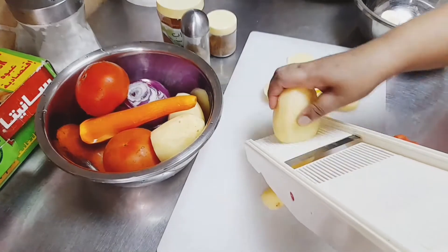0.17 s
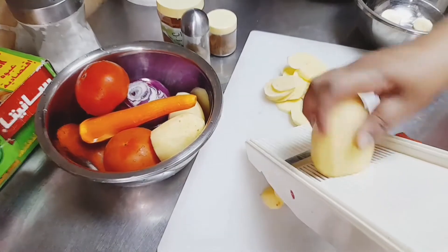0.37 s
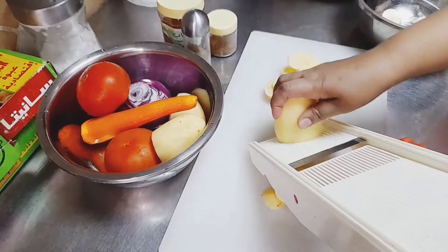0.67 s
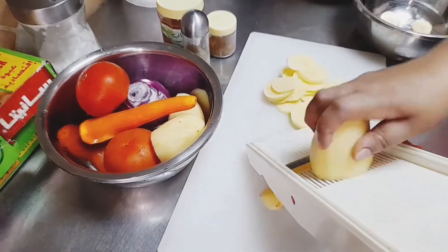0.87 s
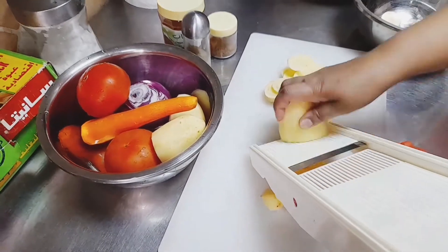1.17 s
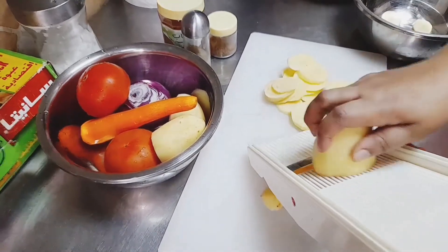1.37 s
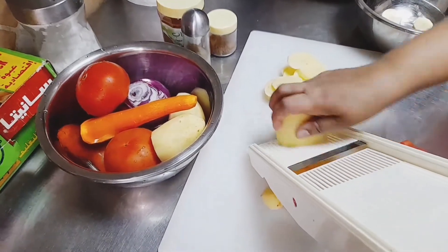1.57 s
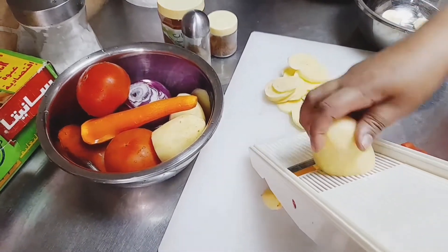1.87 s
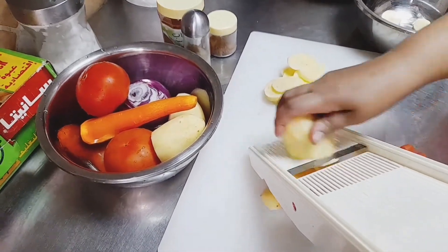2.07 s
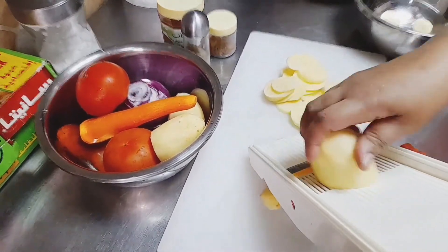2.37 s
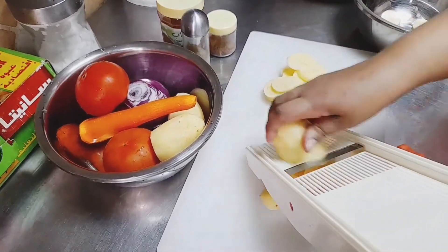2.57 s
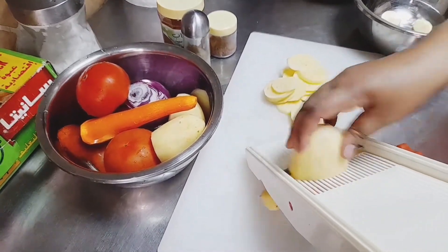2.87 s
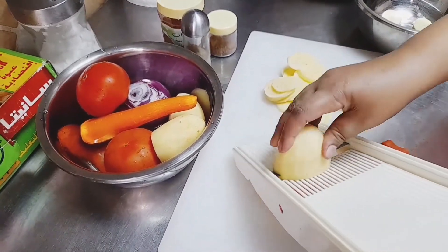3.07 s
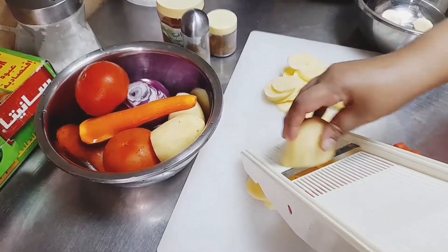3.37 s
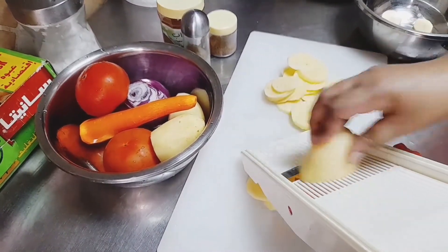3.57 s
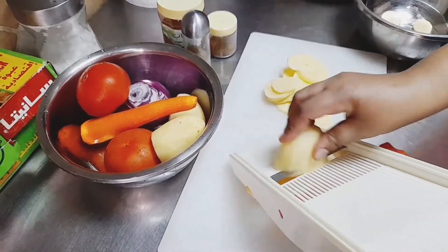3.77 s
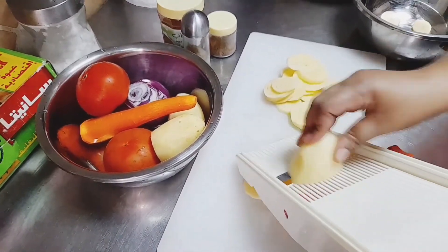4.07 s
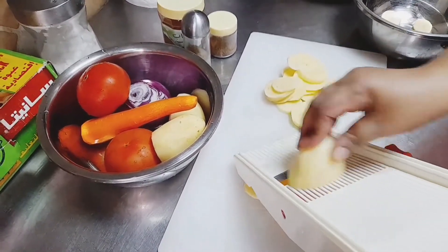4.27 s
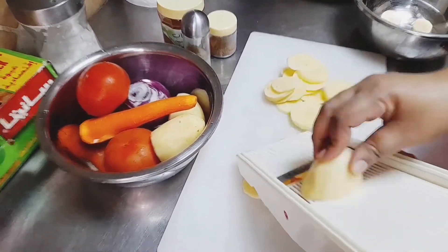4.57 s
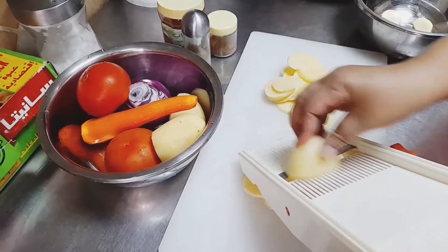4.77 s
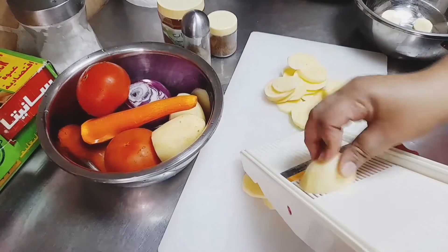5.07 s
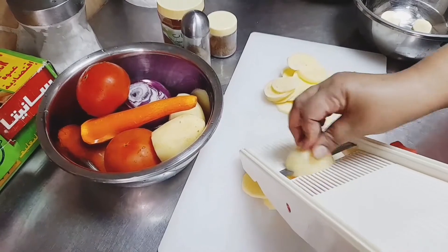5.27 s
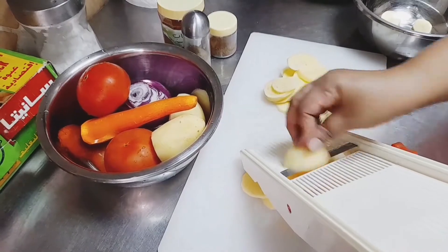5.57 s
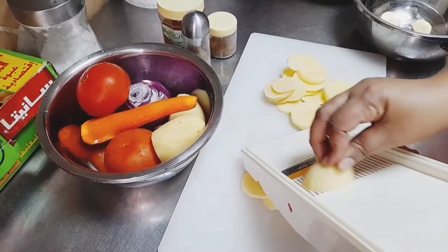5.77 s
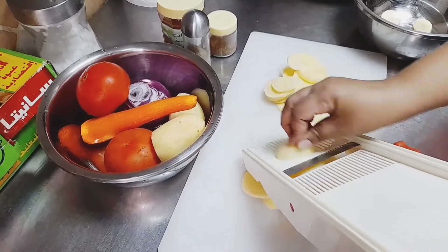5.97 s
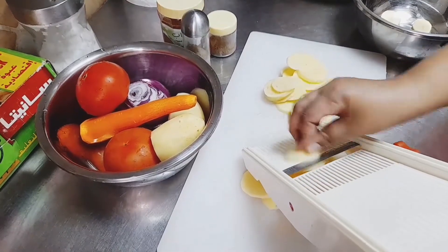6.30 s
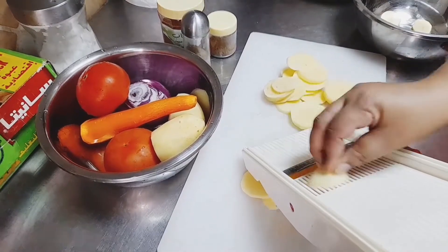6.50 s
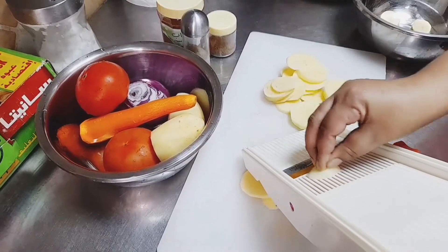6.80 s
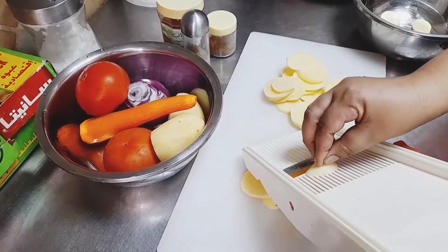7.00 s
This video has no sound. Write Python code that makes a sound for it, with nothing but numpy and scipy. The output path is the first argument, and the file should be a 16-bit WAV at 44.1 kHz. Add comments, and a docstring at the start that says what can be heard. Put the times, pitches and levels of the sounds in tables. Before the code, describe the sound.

A raw potato is sliced on a plastic slicer, heard close and slightly to the right in a small, hard kitchen. From the start, the blade makes short, fine, wet rasps about every half second, and a jostled metal utensil clinks at 0.2 seconds. Between cuts the plastic frame gives sharp, briefly ringing clacks, louder than the rasps, roughly twice a second. Dull thuds of potato on the frame cluster in the first second. From about 2.8 seconds the cuts become shorter and quicker, around three a second, with light ticks and very faint wet glides between them. Clacks and thuds are strong from 4.5 to 5.1 seconds, and return at about 5.6, 6.2 and 6.5. A last small cut and a softer clink come near 6.8 seconds. A low worktop rumble and faint room tone lie underneath, and the walls add a short tail.

```python
"""A small, hard kitchen: a raw potato is pushed again and again over a plastic slicer on a cutting board.
The blade tears through wet cells with a short, fine rasp, and the worktop rumbles under the pushing hand.
Flesh thuds on the frame, the plastic clacks, rings and ticks, and a jostled utensil clinks twice.
Between cuts the potato glides faintly over the wet ramp. The close walls add a short tail."""
import sys
import numpy as np
from scipy import signal
from scipy.fft import rfft, irfft, next_fast_len
from scipy.io import wavfile
from scipy.ndimage import uniform_filter1d

SR = 44100
rng = np.random.default_rng(int(sys.argv[2]) if len(sys.argv) > 2 else 0)


def unload_wav(signal):
    """Save mono or channel-first audio to the path in sys.argv[1] as 16-bit WAV at rate SR, clipped to [-1, 1]."""
    wavfile.write(
        sys.argv[1],
        SR,
        np.round(np.clip(np.atleast_2d(signal).T, -1, 1) * 32767).astype(np.int16),
    )


N = 314765
T = np.arange(SR // 2) / SR  # time within one hit


def amp(db):
    """Decibels to gain."""
    return 10 ** (np.asarray(db) / 20)

def unit(x):
    """Scale to rms 1."""
    return x / np.sqrt(np.mean(x ** 2) + 1e-20)

def along(points, hz):
    """Read (frequency, value) points on a log axis."""
    f, v = np.transpose(points)
    return np.interp(np.log(hz + 1), np.log(f + 1), v)

def add(track, s, sound):
    """Mix a sound into the track from time s on."""
    part = track[:, max(0, round(s * SR)):][:, :sound.shape[-1]]
    part += sound[..., :part.shape[1]]

def filtered(x, response):
    """EQ x with a gain given as a function of frequency."""
    size = next_fast_len(x.shape[-1] + 8192)
    return irfft(rfft(x, size) * response(np.fft.rfftfreq(size, 1 / SR)), size)[..., :x.shape[-1]]

# Stereo width: f/Hz, side minus mid/dB
WIDTH = [(60, -12), (250, -10), (700, -6), (1200, 0), (2200, -2), (5500, 1), (8000, -4), (14000, -4)]
def spread(pair):
    """Two unrelated signals become left and right, near mono in the bass."""
    side = filtered(pair[1], lambda hz: amp(along(WIDTH, hz)))
    return unit(np.array([pair[0] + side, pair[0] - side]))

def noise(spectrum, size=len(T)):
    """Coloured stereo noise of rms 1."""
    return spread(filtered(rng.standard_normal((2, size)), lambda hz: amp(along(spectrum, hz))))

def contact(hz):
    """Noise of a brief touch: a broad hump around its centre."""
    return noise([(hz / 8, -18), (hz / 2.5, -3), (hz * 1.2, 0), (hz * 2.2, -12), (hz * 6, -22)])

def attack(rise):
    """Onset of a hit, with a time constant in seconds."""
    return 1 - np.exp(-T / rise)

def fade(rise, t60):
    """Envelope of a hit: quick attack, exponential decay."""
    return attack(rise) * amp(-60 * T / t60)

def radiation(phase, pan_db):
    """Each mode radiates its own way: its complex gain to left and right."""
    side = np.array([[.5], [-.5]])
    return unit(amp(side * pan_db)) * np.exp(1j * side * phase)

def ring(modes, scatter_db, damping=0):
    """Modes struck at fresh strengths and slightly detuned; a gripping hand adds damping in dB/s."""
    out = np.zeros((2, len(T)))
    for hz, db, t60, phase, pan_db in modes:
        pitch = hz * (1 + rng.normal(0, .005))
        wave = np.exp(1j * (2 * np.pi * pitch * T + rng.uniform(0, 2 * np.pi)))
        level = db + rng.normal(0, scatter_db) - (60 / t60 + damping) * T
        out += amp(level) * np.real(radiation(phase, pan_db) * wave)
    return out / np.sqrt(sum(amp(mode[1]) ** 2 for mode in modes))

def resonate(force, modes):
    """Modes of alternating polarity, driven by a continuous force."""
    def response(f):
        total = 0
        for k, (hz, db, t60, phase, pan_db) in enumerate(modes):
            peak = 1 / (1 + 2j * np.pi * (f - hz) * t60 / np.log(1000))
            total += (-1) ** k * amp(db) * radiation(phase, pan_db) * peak
        return total
    return unit(filtered(force, response))

# Reverb time of the kitchen: f/Hz, t60/s
KITCHEN_DECAY = [(100, 0.17), (500, 0.44), (1400, 0.28), (4000, 0.29), (9000, 0.28), (16000, 0.23)]
def kitchen(x, wet_db):
    """The sound with a fresh diffuse tail from the close walls."""
    hz, t, bands = signal.stft(noise([(20, 0.02), (20000, 0)]), SR, nperseg=256)
    decay = amp(-60 * t / along(KITCHEN_DECAY, hz)[:, None])
    tail = signal.istft(bands * decay, SR, nperseg=256)[1][:, :len(T)]
    bloom = 1 - np.exp(-(T / 0.0078) ** 2)
    tail = unit(tail * bloom) / np.sqrt(len(T))
    return x + amp(wet_db) * signal.fftconvolve(x, tail, axes=1)[:, :x.shape[1]]

def reflections(x, db, count=8):
    """Bowls and jars throw the treble back within a few milliseconds and comb it."""
    out = x.copy()
    treble = filtered(x, lambda hz: np.clip(hz / 1500 - 1, 0, 1))
    for delay in rng.uniform(.0008, .009, count):
        add(out, delay, amp(db) * rng.standard_normal((2, 1)) * treble)
    return out

def stroke(start, length, db, change_db, rise, release):
    """Strength of one rub: it sets in, ramps by change_db and stops as the potato runs off."""
    t = np.arange(N) / SR - start
    from_middle = np.clip(t / length, 0, 1) - .5
    gate = np.clip(t / rise + .5, 0, 1) * np.clip((length - t) / release + .5, 0, 1)
    return gate * amp(db + change_db * from_middle)

# Passes of the blade through the potato: t/s, length/s, level/dB, change from bite to exit/dB
CUTS = [(0.0, 0.13, -39, -9.5), (0.472, 0.12, -38.5, 0), (0.93, 0.13, -39, -0.5), (1.419, 0.1, -38, -4),
        (1.962, 0.109, -38.5, 2.5), (2.405, 0.18, -39.5, -5.5), (2.847, 0.067, -37.5, -5.5),
        (3.115, 0.049, -39, 2), (3.564, 0.06, -35.5, -1.5), (3.749, 0.05, -40.5, 10),
        (4.039, 0.085, -37.5, -4), (4.372, 0.023, -38, 1), (4.604, 0.062, -35.5, -4.5),
        (4.866, 0.059, -37.5, 1), (5.104, 0.068, -38.5, 0.5), (5.42, 0.025, -38.5, 3),
        (5.803, 0.025, -41.5, 6.5), (5.863, 0.073, -39, 0.5), (6.235, 0.062, -37.5, -1.5),
        (6.525, 0.055, -40, -3), (6.706, 0.034, -49, 20)]
def cutting():
    """Force on the blade as it bites and lets go, cut after cut."""
    return sum(stroke(*row, rise=0.013, release=0.013) for row in CUTS)

def cell_bursts():
    """Thousands of cells burst each second, so closely that they merge into a fizz."""
    strength = amp(2 * rng.standard_normal(N)) * (rng.random(N) < .7)
    return strength * rng.standard_normal((2, N))

# Colour of the wet rasp: f/Hz, level/dB
RASP_EQ = [(600, -11), (950, -9), (1500, -3), (2050, -5), (2400, -3), (2950, -7), (3310, -1), (3730, -6.5),
           (4240, -3), (5070, -7.5), (6500, -3.5), (7400, -1), (8700, -10), (11800, -1), (15600, -5.5)]
# Low and high modes of the plastic frame: f/Hz, level/dB, t60/s, left lead/rad, left minus right/dB
FRAME_LOW = [(312.4, -3, 0.11, 0.7, -9), (393, -12, 0.016, -0.1, -10), (404, -3.5, 0.099, 0.4, -5.5),
             (474.7, 3.5, 0.091, 0.52, 1.5), (594.7, -1, 0.076, 0.7, -13), (651.5, 0.5, 0.07, 0, 12),
             (737.3, -1.5, 0.072, -0.2, 0), (817.5, -3, 0.1, -0.2, 4)]
FRAME_HIGH = [(1113, -2.5, 0.095, -1.3, 0.5), (1190, -0.5, 0.11, -3, 2), (1259.7, 5, 0.067, 1.02, -2.5),
              (1397, 1, 0.072, -2.5, 2), (1456, 1.5, 0.076, -2.3, -0.5), (1557, -6.5, 0.045, 0, -3),
              (1733, -3.5, 0.052, 0.5, 13), (1866, -5, 0.065, -2.5, 8), (2025, -2, 0.066, -2, -1),
              (2400, -10, 0.13, -5.5, -2.5)]
def slicing(force):
    """Dense cell bursts hiss at the blade and shake the modes of the frame."""
    grain = amp(1.2 * unit(uniform_filter1d(rng.standard_normal(N), 180)))  # the flesh is uneven
    hiss = spread(filtered(cell_bursts(), lambda hz: amp(along(RASP_EQ, hz))))
    drag = cell_bursts()[0]
    body = amp(-10) * resonate(drag, FRAME_LOW) + amp(-7) * resonate(drag, FRAME_HIGH)
    return kitchen(force * grain * (amp(4.5) * hiss + body), wet_db=-6.5)

# Swells as the hand shifts its weight, and the fader curve of its steady tremor: t/s, level/dB
LEANS = [(0.2, -45), (0.42, -42.5), (0.63, -35.5), (1.14, -48), (2.09, -50), (2.46, -44), (2.62, -49),
         (2.86, -36), (3.25, -39), (3.82, -42.5), (3.92, -46), (4.06, -38.5), (4.47, -43), (4.99, -44),
         (5.5, -53), (5.7, -42), (6.76, -59)]
TREMOR = [(0, -42.5), (1.0, -47), (1.85, -51.5), (2.25, -54), (2.7, -46), (3.4, -51), (6.0, -49.5),
          (6.8, -53.5), (7.14, -62)]
# Colour of the worktop's rumble: f/Hz, level/dB
RUMBLE_EQ = [(20, -57), (30, -38), (40, -20), (48, -13), (62, -5.5), (71, 4.5), (84, -6.5), (98, -6),
             (119, -2.5), (140, -20), (161, -6.5), (195, -20), (310, -12), (500, -34), (900, -44)]
def worktop(cut):
    """Cuts, knocks and the leaning hand feed the low modes of the steel top."""
    t = np.arange(N) / SR
    decay = fade(rise=.008, t60=0.49) ** 2
    power = np.abs(signal.fftconvolve((amp(-6.5) * cut) ** 2, decay / decay.sum()))[None, :N]
    for s, _, _, knock_db, _ in CLACKS:
        add(power, s, amp(knock_db - 14) ** 2 * decay)
    for s, db in LEANS:
        power += amp(db) ** 2 * np.exp(-((t - s) / 0.029) ** 2)  # a push of about 60 ms
    tremor = amp(np.interp(t, *np.transpose(TREMOR)))
    return np.sqrt(power + tremor ** 2) * noise(RUMBLE_EQ, N)

# Colour of the still kitchen: f/Hz, level/dB
ROOM_EQ = [(20, -25.5), (30, -8), (42, 18), (70, 20), (150, 31), (300, 24.5), (600, 17.5), (900, 8.5),
           (1500, 4.5), (3000, -4), (7000, -10), (12000, 1), (15500, -6.5), (16500, -27)]
def room_tone():
    """The steady air of the room, a faint dark bed."""
    return amp(-55) * noise(ROOM_EQ, N)

# Dull bumps of potato and hand on the frame: t/s, level/dB
BUMPS = [(0.189, -30.5), (0.245, -39.5), (0.319, -31.5), (0.491, -31.5), (0.637, -26.5), (0.815, -31.5),
         (0.88, -25.5), (0.932, -29.5), (1.047, -25), (1.302, -37), (2.859, -28.5), (3.154, -28.5),
         (3.558, -32), (3.584, -39), (3.793, -35), (4.038, -27.5), (4.274, -39), (4.565, -21),
         (4.824, -24.5), (5.069, -21.5), (5.323, -37), (5.409, -29), (5.835, -34), (5.89, -30.5),
         (5.929, -28), (6.17, -22), (6.294, -32), (6.463, -21), (6.568, -32.5)]
# Colour of the thud: f/Hz, level/dB
THUD_EQ = [(100, -22.5), (220, -9.5), (320, 2), (480, -3), (650, -9), (900, -23), (2000, -20.5),
           (6000, -47)]
def bumps():
    """Soft flesh gives only a low thud."""
    out = np.zeros((2, N))
    for s, db in BUMPS:
        add(out, s, amp(db) * noise(THUD_EQ) * fade(rise=0.0016, t60=0.083))
    return out

# Jostled utensils: t/s, contact level/dB, ring level/dB, contact centre f/Hz
CLINKS = [(0.2, -12, -23.5, 2450), (6.824, -26.5, -27.5, 1300)]
# Metal modes, one set per clink: f/Hz, level/dB, t60/s
UTENSIL_MODES = [
    [(758, 5, 0.05), (2024, 10.5, 0.065), (2840, 6, 0.079), (3260, 8.5, 0.15), (3360, -13.5, 0.17),
     (3300, -12, 0.27), (4160, -9, .08)],
    [(650, 13, 0.035), (955, 4.5, 0.097), (1520, -7, .12), (1680, -2, 0.089), (1860, -3, 0.12),
     (2790, -6, 0.09)],
]
def clinks():
    """A brief rattle of contact, then the metal rings on."""
    out = np.zeros((2, N))
    for (s, contact_db, ring_db, hz), modes in zip(CLINKS, UTENSIL_MODES):
        centred = [(*mode, 0, 0) for mode in modes]
        metal = amp(ring_db + 1.5) * ring(centred, scatter_db=0.5) * attack(0.0022)
        rattle = amp(contact_db) * contact(hz) * fade(rise=0.0053, t60=0.049)
        add(out, s, metal + rattle)
    return kitchen(out, wet_db=-8)

# The potato lands or leaves: t/s, crack level/dB, ring level/dB, knock level/dB, hand damping/(dB/s)
CLACKS = [(0.3626, -13.5, -21.5, -22.5, 0), (0.574, -21.5, -22, -23, 400), (0.860, -13.5, -20.5, -18.5, 50),
          (1.054, -18, -19.5, -21, 350), (1.3652, -13.5, -17.5, -17, 50), (1.8644, -18, -25, -24, 0),
          (2.329, -16.5, -23, -20, 100), (2.784, -16, -19, -18.5, 252), (3.162, -25, -24, -24.5, 300),
          (3.466, -26, -28, -26, 103), (3.477, -21.5, -39, -25, 100), (3.9889, -14, -19.5, -17.5, 100),
          (4.352, -36, -37.5, -29.5, 50), (4.544, -15, -19, -17, 50), (4.799, -13.5, -26, -19, 46),
          (4.808, -15, -22.5, -20.5, 50), (5.052, -18, -21, -20, 48), (5.384, -31, -39, -40, 50),
          (5.6075, -14, -20, -19, 50), (6.144, -17.5, -22.5, -27, 100), (6.168, -24, -25.5, -24, 100),
          (6.439, -23, -28, -30, 103.5), (6.453, -19, -22, -25.5, 100), (6.736, -34.5, -35.5, -29.5, 99)]
# Colours of the first hard snap, the chattering crack and the frame's heave: f/Hz, level/dB
SNAP_EQ = [(1000, -26), (5000, -7), (8700, -11), (12000, -1.5), (15500, -6)]
CRACK_EQ = [(600, -12.5), (1200, 0.5), (2000, 3), (2800, -2.5), (4000, -0.5), (5500, -2), (7400, 0.5),
            (8700, -8), (10000, -5.5), (12000, -0.5), (15500, -7.5), (17000, -12)]
HEAVE_EQ = [(150, -20), (350, -15.5), (780, 6.5), (960, -11.5), (1300, -5), (2100, -14.5), (4000, -31)]
def clacks():
    """Plastic snaps down and chatters for a few milliseconds; the frame's low modes follow its high ones."""
    out = np.zeros((2, N))
    knots = T[::40]  # the chatter takes a new level about every millisecond
    for s, crack_db, ring_db, knock_db, damping in CLACKS:
        chatter = amp(1.45 * np.interp(T, knots, rng.standard_normal(len(knots))))
        snap = amp(crack_db - 2) * noise(SNAP_EQ) * fade(rise=0.00015, t60=0.023)
        crack = amp(crack_db + 0.5) * noise(CRACK_EQ) * chatter * fade(rise=0.0018, t60=0.045)
        plate = amp(ring_db + 5.5) * ring(FRAME_HIGH, scatter_db=2.5, damping=damping) * attack(0.001)
        knock = amp(knock_db + 2) * ring(FRAME_LOW, scatter_db=1.5, damping=damping / 2) * attack(0.0023)
        heave = amp((ring_db + knock_db) / 2 + 3) * noise(HEAVE_EQ) * fade(rise=0.0051, t60=0.048)
        touch = amp(crack_db - 26) * noise(CRACK_EQ) * fade(rise=.004, t60=.1)
        add(out, s - .008, touch)  # wet flesh lands first
        add(out, s, kitchen(snap + crack, wet_db=-6) + kitchen(plate + knock, wet_db=-6.5))
        add(out, s + 0.001965, heave)  # the feet press into the board
    return out

# Light ticks of the plastic: t/s, level/dB, centre f/Hz
TICKS = [(0.636, -34, 794), (0.821, -59, 1490), (0.85, -29.5, 6000), (1.3, -52.5, 2500),
         (2.616, -43.5, 1040), (2.714, -45.5, 2060), (2.778, -36, 1830), (4.718, -38, 1040),
         (6.031, -34.5, 2090)]
def ticks():
    """A light touch on plastic is all edge and no ring."""
    out = np.zeros((2, N))
    for s, db, hz in TICKS:
        add(out, s, amp(db + 4) * contact(hz) * fade(rise=0.00023, t60=0.027))
    return out

# Glides of the potato over the wet ramp: t/s, length/s, level/dB
GLIDES = [(2.287, 0.056, -53.5), (3.008, 0.1, -53.5), (3.42, 0.049, -60), (3.932, 0.048, -62),
          (4.22, 0.098, -56), (4.508, 0.05, -51.5), (4.76, 0.04, -55.5), (5.014, 0.075, -54),
          (5.265, 0.082, -59.5), (5.5, 0.05, -64), (6.403, 0.067, -54), (6.772, 0.055, -61)]
def gliding():
    """Friction on the ramp between cuts, swelling as each glide gathers speed."""
    return sum(stroke(*row, change_db=3.5, rise=.037, release=0.02) for row in GLIDES)

def scene():
    """The slicer over rumble and room tone, all panned a little to the right."""
    cut = cutting()
    force = cut + amp(-3) * gliding()
    slicer = reflections(clacks() + slicing(force), db=-19)
    handling = kitchen(bumps() + ticks(), wet_db=-5)
    return (slicer + handling + clinks() + worktop(cut) + room_tone()) * amp([[-.5], [.5]])

def record(dry):
    """A steep low-pass takes off the very top of the treble."""
    cutoff_hz = 15950
    return filtered(dry, lambda hz: 1 / (1 + (hz / cutoff_hz) ** 120))

dry = scene()
out = record(dry)
unload_wav(out)
```